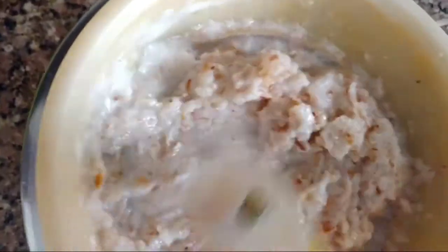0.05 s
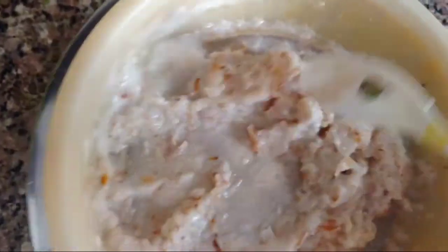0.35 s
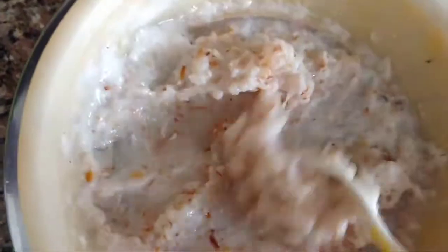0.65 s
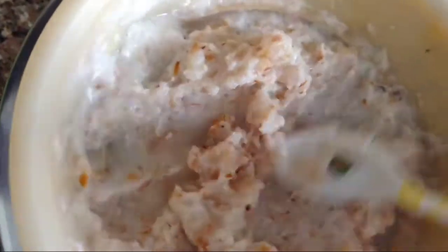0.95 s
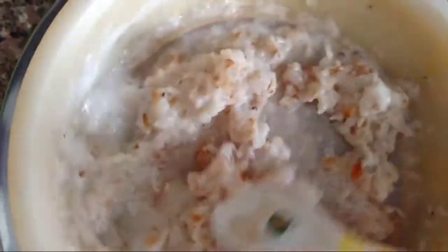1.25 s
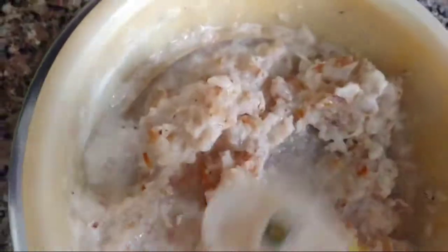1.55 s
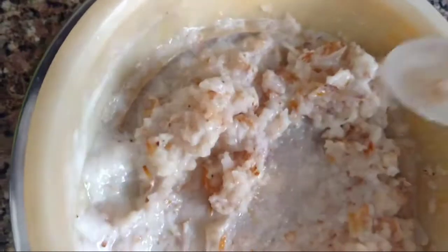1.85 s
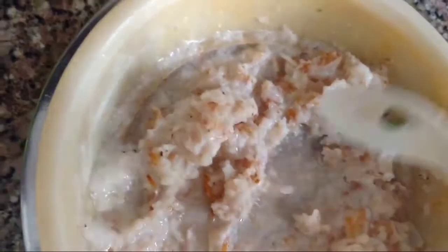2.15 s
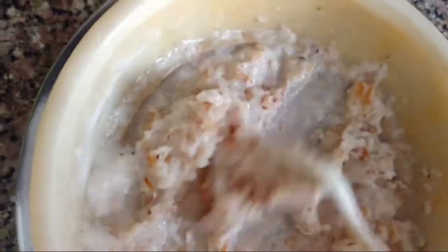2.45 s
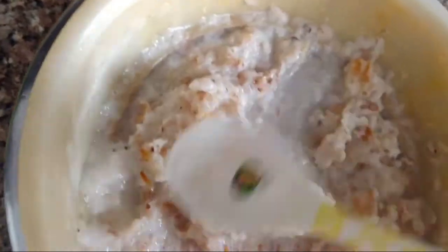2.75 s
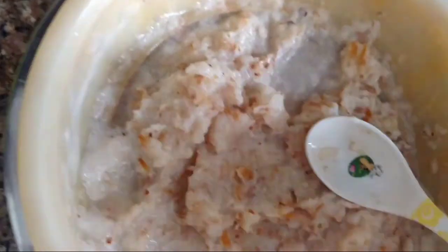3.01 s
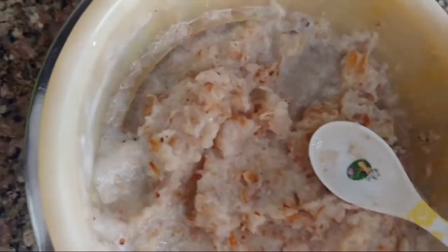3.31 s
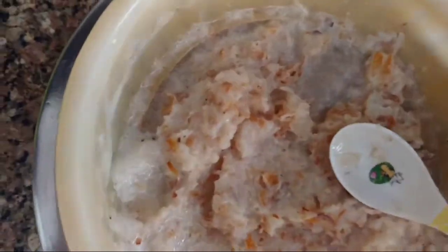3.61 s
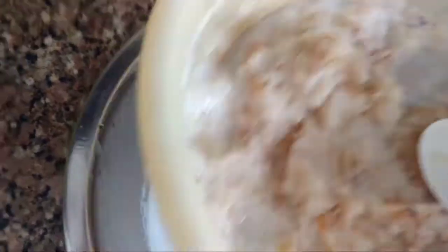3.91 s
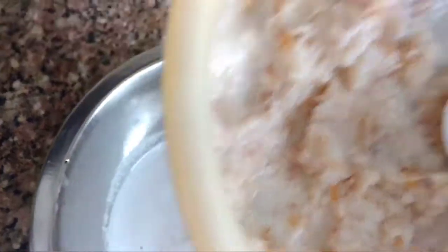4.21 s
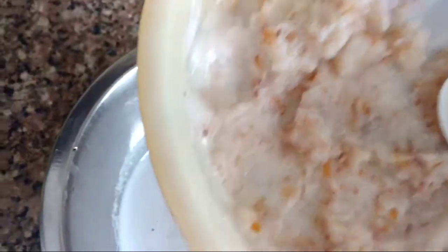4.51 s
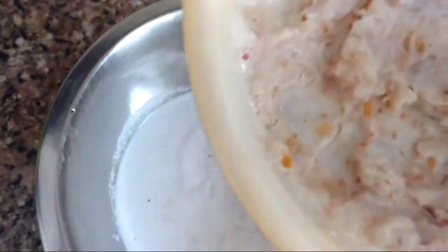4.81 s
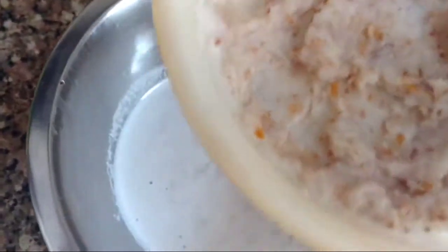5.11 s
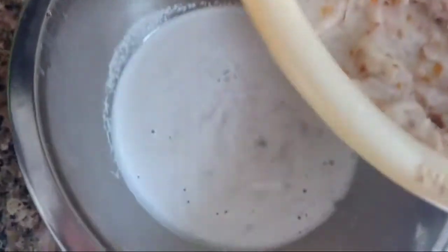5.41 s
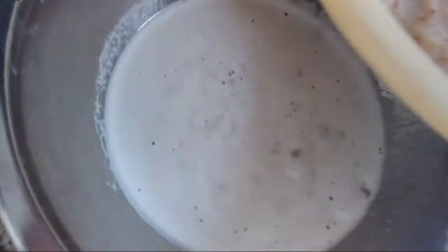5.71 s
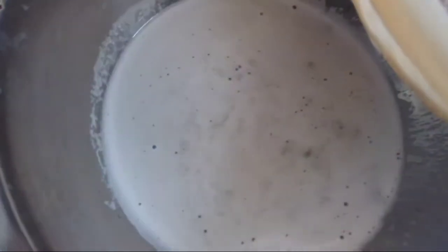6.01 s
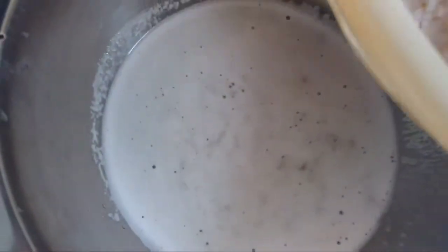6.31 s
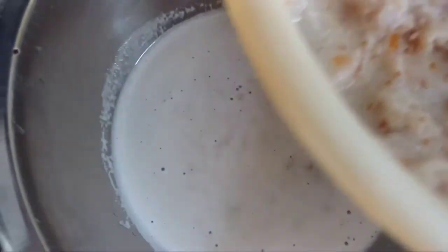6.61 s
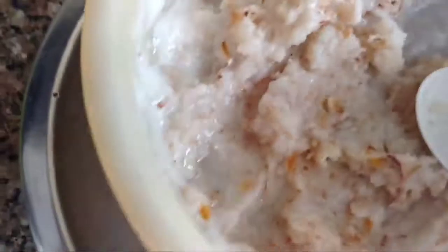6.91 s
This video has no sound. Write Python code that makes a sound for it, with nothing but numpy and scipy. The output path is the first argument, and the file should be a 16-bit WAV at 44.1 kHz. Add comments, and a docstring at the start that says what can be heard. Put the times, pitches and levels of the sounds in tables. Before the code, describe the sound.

Wet crackling, scraping and taps of a spoon mashing pulp in a strainer, followed by fan-like hiss and one dull clack.

```python
"""A plastic spoon presses wet fruit pulp through a strainer resting in a steel bowl.
Bursting films and air pockets crackle, tick and smack; squeezed air gurgles. The spoon rubs, taps
and bumps the strainer, and the bowl rings. The strainer is lifted over the rim and at last set down
on the bowl. A fan-like hiss fills the kitchen. A close two-port microphone with gain control hears it."""
import sys
import numpy as np
from scipy import signal
from scipy.fft import rfft, irfft, next_fast_len
from scipy.io import wavfile
from scipy.ndimage import uniform_filter1d, minimum_filter1d, map_coordinates

SR = 44100
rng = np.random.default_rng(int(sys.argv[2]) if len(sys.argv) > 2 else 0)


def to_wav(s):
    """Save 16-bit WAV."""
    ch = np.atleast_2d(s).T  # columns
    pcm = np.round(np.clip(ch, -1, 1) * 32767)  # PCM
    wavfile.write(sys.argv[1], SR, pcm.astype(np.int16))


N = 306759
FFT_N = next_fast_len(N)
TIME_S = np.arange(N) / SR

# Fan hiss. Each row: frequency in Hz, relative density in dB.
HISS_SPECTRUM = [(25, -16), (55, -18.5), (100, -3.5), (170, -1), (255, -12), (330, -3), (600, -5.5),
                 (1000, -11.5), (1500, -14), (2800, -17.5), (5000, -25.5), (8500, -30), (12000, -39),
                 (15000, -46)]
# Hiss as the microphone moves. Each row: time in seconds, level in dB.
HISS_LEVELS = [(0, -38.5), (.9, -38.5), (2.2, -38.5), (3.1, -38), (3.6, -44), (4.1, -40), (4.8, -38.5),
               (5.5, -38), (6.3, -38.5), (6.96, -38)]
# Fan hum. Each row: frequency in Hz, level against the hiss in dB.
HUM_LINES = [(214, -15), (325, -15), (343, -15.5), (441, -12.5)]
# Likeness of the ports for room sound and for close sound. Each row: frequency in Hz, correlation.
ROOM_CORRELATION = [(50, -0.98), (125, -0.55), (260, -0.13), (500, 0.83), (1000, 0.14), (2200, -0.11),
                    (16000, 0.15)]
NEAR_CORRELATION = [(60, -0.34), (300, 1), (1200, 0.47), (2400, 0.27), (4000, -0.13), (16000, -0.025)]
# Spoon strokes. Each row: hardest push, swell and ease in seconds, crackle and rubbing in dB.
SPOON_STROKES = [(0.01, 0.093, 0.062, -38, -61), (.34, 0.31, 0.09, -47.5, -40.5),
                 (.395, 0.17, 0.089, -44, -59), (.74, 0.34, 0.2, -48.5, -47),
                 (.997, 0.05, 0.15, -37.5, -45), (1.1, 0.057, 0.17, -45, -38),
                 (1.455, 0.11, 0.13, -36.5, -35), (1.56, 0.081, 0.22, -45, -39.5),
                 (1.72, 0.13, 0.073, -49, -38.5), (1.805, 0.096, 0.1, -44, -36.5),
                 (2.49, 0.13, 0.11, -42.5, -38), (2.58, 0.067, 0.2, -48.5, -47),
                 (2.69, 0.075, 0.23, -69, -43.5), (2.88, 0.032, 0.27, -51, -45.5),
                 (3.53, 0.27, 0.35, -54, -43.5), (3.63, 0.076, 0.079, -48, -41),
                 (3.72, 0.019, 0.045, -40.5, -40), (3.85, 0.13, 0.091, -52, -41.5),
                 (3.902, 0.03, 0.058, -37, -57)]
# Wet crackle and mesh rubbing. Each row: frequency in Hz, relative density in dB.
CRACKLE_SPECTRUM = [(300, -23), (1000, -2), (2200, -2), (4000, -1), (8500, -0.5), (11000, -7), (15000, -23)]
RUB_SPECTRUM = [(120, -24.5), (330, 10), (600, 6.5), (900, 5), (1250, 5.5), (1800, -13.5), (3000, 1.5),
                (8000, -52)]
# Large air pockets. Each row: snap time in seconds, relative level in dB, centre in Hz,
# t60 in seconds, relative level of the tear in dB.
POCKET_SMACKS = [(.014, -32, 5570, 0.033, -2.5), (0.16, -38.5, 4050, 0.033, -7),
                 (0.214, -42.5, 6860, 0.052, -3), (0.379, -28, 6900, 0.034, -18),
                 (0.3936, -30, 5360, 0.037, -6), (0.947, -35, 4230, 0.042, 0),
                 (.951, -37, 7500, 0.011, -14), (1.265, -35, 7700, 0.014, -9),
                 (1.276, -30.5, 6270, 0.007, -22), (1.313, -35.5, 6550, 0.043, -9),
                 (1.346, -36, 3940, 0.0081, -26), (1.369, -37.5, 6340, 0.035, -7),
                 (1.443, -32, 6460, 0.022, -13), (1.4593, -22.5, 6950, 0.038, -12),
                 (1.679, -33, 6200, 0.023, -3), (1.7115, -33, 6140, 0.053, -11),
                 (1.762, -32, 6740, 0.047, -7), (1.798, -37, 5800, .041, -7),
                 (2.462, -30.5, 3920, 0.028, -9), (2.498, -33.5, 6440, 0.049, -12),
                 (2.565, -39.5, 5600, 0.033, -14), (2.8627, -32, 6160, 0.029, -10),
                 (3.621, -35, 3500, 0.13, 0.5), (3.7133, -37, 6900, 0.024, -11),
                 (3.8894, -25.5, 5030, 0.05, -9), (3.8941, -32, 5900, .03, -8),
                 (3.9143, -35, 5200, .03, -7), (4.032, -42, 4900, 0.032, -6),
                 (6.8245, -39, 5500, 0.014, -14)]
# Spoon on strainer. Each row: start in seconds, then clack level, hollow body, treble,
# spoon ring and bowl ring in dB.
SPOON_TAPS = [(.052, -32.5, 1, -27, -36, -46), (.439, -37.5, 4, -20, -34, -53),
              (0.489, -32, -3, -4, -31.5, -58), (.947, -36, 15, -11, -38, -62),
              (0.9798, -21.5, -2.5, -2.5, -34, -41), (1.008, -30.5, 7, -10, -34, -49),
              (1.13, -42, -16, 1.5, -43, -65), (1.294, -37.5, -5, -10, -41, -67),
              (1.4298, -40, 8, -15, -35, -60), (1.557, -40, -21, -8, -37, -62),
              (2.884, -38.5, 7, -22, -49, -62), (3.165, -19, 3, 0, -19, -48),
              (3.178, -33, 3, -23, -26, -60), (3.4514, -36, 5, 0.5, -39, -54),
              (3.7215, -43, -1, -8, -44, -64), (3.8501, -33, 5, 0.5, -33, -44.5)]
# Plastic clack. Each row: frequency in Hz, relative density in dB.
TAP_SPECTRUM = [(80, -15), (220, -19), (420, -2.5), (1050, -2), (1800, -1.5), (2250, 7), (3000, -3.5),
                (4000, -6.5), (6500, -7), (9500, -8.5), (11500, -21), (15000, -24)]
# Hollow body of the clack. Each row: frequency in Hz, multiplier of the tap's body dB.
BODY_WEIGHTS = [(1600, 2.5), (2100, 1.5)]
# Cushioning by pulp. Each row: frequency in Hz, multiplier of the tap's treble dB.
TREBLE_WEIGHTS = [(2200, 0), (3800, -0.2), (6500, 2.5)]
# Plastic spoon. Each row: frequency in Hz, relative level in dB, bare t60 in seconds.
SPOON_MODES = [(970, -0.5, 0.041), (1135, -8, 0.05), (1460, -1, 0.047), (1524, -13.5, 0.097),
               (1790, -7, 0.1), (2060, -15, 0.03), (2950, -9, 0.037), (3930, -12, 0.024)]
# Steel bowl. Each row: frequency in Hz, relative level in dB, t60 and rise in seconds.
BOWL_MODES = [(337, -14, 0.28, .002), (412, 15.5, 0.18, 0.031), (621, 0, 0.2, 0.0013),
              (905, 2, 0.11, 0.001), (1132, -7, 0.52, 0.0013), (1315, -10, 0.4, 0.0017),
              (1348, -3, 0.098, 0.0012), (1540, -12, 0.35, 0.00083), (1605, -15, 0.18, 0.00084),
              (1950, -19, 0.22, 0.00091), (2570, -7, 0.065, 0.0011), (3440, -38, 0.29, .001),
              (4500, -26.5, 0.23, 0.0011)]
# Soft blows on the loaded strainer. Each row: start in seconds, thud in dB and Hz,
# flex in dB and Hz, flex t60 in seconds, after-ring in dB.
STRAINER_BUMPS = [(0.2114, -17.5, 156, -15.5, 290, 0.036, -37), (0.4882, -34, 135, -18, 325, 0.027, -50),
                  (0.9782, -46, 171, 2, 391, 0.026, -20), (1.008, -30, 110, -20.5, 345, .05, -46),
                  (1.313, -16.5, 143, -9.5, 320, 0.022, -38), (1.555, -22.5, 128, -22, 318, .03, -51),
                  (1.7049, -13, 130, -6, 325, 0.023, -33), (1.738, -38, 135, -19, 298, 0.046, -39),
                  (1.79, -25, 133, -19, 383, 0.031, -40), (2.4077, -21, 206, -7.5, 335, 0.031, -25.5),
                  (2.455, -31, 134, -19, 343, 0.043, -35), (2.673, -47, 135, -27, 347, 0.048, -38),
                  (3.165, -40, 135, -18, 414, 0.034, -29.5), (3.636, -41, 135, -23.5, 323, .055, -39),
                  (3.8493, -35, 110, -10, 447, 0.038, -40), (6.825, -33, 135, -19, 217, .04, -27),
                  (6.854, -31, 149, -22, 207, 0.049, -44)]
# Air squeezed under the spoon. Each row: start in seconds, relative level in dB, length in seconds,
# start and end pitch in Hz.
AIR_GURGLES = [(0.331, -36, 0.037, 1086, 887), (1.432, -31, 0.012, 670, 753),
               (1.436, -38.5, 0.02, 1346, 1560), (1.79, -30.5, 0.033, 1406, 1170),
               (1.843, -44, 0.011, 1210, 1180), (2.484, -28, 0.019, 1220, 1270),
               (2.501, -30.5, 0.031, 1240, 930), (3.814, -40, 0.03, 2190, 2030)]
# Thin films snapping. Each row: start in seconds, level in dB, centre in Hz.
FILM_TICKS = [(0.613, -51, 10000), (0.647, -45, 9600), (0.721, -44, 10000), (1.168, -46, 8000),
              (1.5975, -55, 6500), (1.67, -41, 9000), (1.679, -38, 5970), (1.718, -42, 6500),
              (1.7425, -45, 4220), (1.7992, -46, 7000), (2.1428, -44.5, 7500), (2.282, -49, 10400),
              (3.04, -50, 11500)]
# Strainer dragged over the rim. Each row: peak, swell and ease in seconds, level in dB.
RIM_DRAGS = [(3.9, 0.14, 0.19, -40)]
# Zing of that contact. Each row: frequency in Hz, relative level in dB, t60 in seconds.
ZING_MODES = [(1252, 1, 0.14), (2940, -1, 0.031), (4360, -12, 0.01), (6520, -2, 0.0094), (9300, -11, 0.01)]
# Strainer rubbing in the hand. Each row: peak, swell and ease in seconds, level in dB.
HAND_RUBS = [(6.32, 0.32, 0.49, -36.5)]
# Colour of that rub. Each row: frequency in Hz, relative density in dB.
HAND_SPECTRUM = [(100, -19), (300, -2.5), (700, 5), (1300, -9.5), (2000, -8.5), (3000, -31), (8000, -50)]
# Strainer landing and rocking once. Each row: start in seconds, level in dB, tilt in dB per octave,
# clatter t60 in seconds, snap-to-clatter ratio, bowl ring in dB.
LANDING_HITS = [(6.858, -15, 4, 0.02, 1.8, -21), (6.8723, -29, 12, .02, 0.95, -46)]
# Its dull clack. Each row: frequency in Hz, relative density in dB.
LANDING_SPECTRUM = [(30, -42), (70, -12), (110, -18), (220, -3), (420, 15.5), (900, 7.5), (1650, 1),
                    (2150, -11), (2750, -9), (3300, -23.5), (4000, -20), (7000, -29), (12500, -43),
                    (15000, -58)]
# Kitchen reverberation. Each row: frequency in Hz, t60 in seconds.
ROOM_DECAY = [(150, 0.93), (500, 0.19), (2000, 0.47), (6000, 0.26), (14000, 0.15)]

TEAR_S = 0.0073  # a film stretches and tears this long before it snaps


def gain_of(db):
    """Decibels to amplitude."""
    return 10 ** (np.asarray(db) / 20)


def unit_rms(x):
    """Scales to rms 1."""
    return x / np.sqrt(np.mean(x ** 2) + 1e-20)


def value_at(points, hz):
    """Interpolates on a log-frequency axis."""
    points_hz, values = np.transpose(points)
    return np.interp(np.log(hz + 1), np.log(points_hz + 1), values)


def add(mix, start_s, sound):
    """Mixes a sound in at start_s."""
    part = mix[:, max(0, round(start_s * SR)):][:, :sound.shape[-1]]
    part += sound[..., :part.shape[1]]


def drift(rate_hz):
    """Smooth random wander of rms 1."""
    hz = np.fft.rfftfreq(FFT_N, 1 / SR)
    slow = rfft(rng.standard_normal(FFT_N)) * np.exp(-(hz / rate_hz) ** 2)
    return unit_rms(irfft(slow, FFT_N)[:N])


def highpass(x, corner_hz):
    """Second-order bass cut."""
    return signal.sosfilt(signal.butter(2, corner_hz, "high", fs=SR, output="sos"), x)


def colour(x, spectrum, size=2048):
    """Minimum-phase filter with the given spectrum."""
    log_gain = np.log(gain_of(value_at(spectrum, abs(np.fft.fftfreq(size, 1 / SR)))))
    impulse = np.fft.ifft(np.exp(np.conj(signal.hilbert(log_gain)))).real
    return signal.fftconvolve(x, impulse[None, :size // 2], axes=1)[:, :x.shape[1]]


def ports(x, correlation):
    """Turns two unrelated signals into a correlated pair."""
    size = next_fast_len(x.shape[1])
    same = np.clip(value_at(correlation, np.fft.rfftfreq(size, 1 / SR)), -.99, .99)
    common, apart = rfft(x, size) * np.sqrt([(1 + same) / 2, (1 - same) / 2])
    return irfft([common + apart, common - apart], size)[:, :x.shape[1]]


def burst(spectrum, t60_s, snap, size=4096):
    """An impulse of size snap and a dying rattle after 20 lead-in samples; rms 1 over the first 10 ms."""
    t = np.arange(size) / SR
    x = rng.standard_normal((2, size)) * gain_of(-60 * t / t60_s)
    x /= np.linalg.norm(x[0])
    x[:, 0] += snap * np.array([1, .5])
    x = ports(colour(np.pad(x, ((0, 0), (20, 0))), spectrum), NEAR_CORRELATION)
    return x / np.sqrt(np.mean(x[:, :SR // 100] ** 2))


def mode(hz, t60_s, rise_s):
    """One damped resonance, eased in by a soft contact."""
    t = np.arange(SR // 2) / SR
    onset = 1 - np.exp(-(t / rise_s) ** 2)
    return np.sin(2 * np.pi * hz * t) * gain_of(-60 * t / t60_s) * onset


def grains(per_s, spread_db):
    """Random tiny clicks of uneven size at each port."""
    sizes = gain_of(spread_db * np.minimum(rng.exponential(1, (2, N)), 4))
    return unit_rms(sizes * rng.standard_normal((2, N)) * (rng.random((2, N)) < per_s / SR))


def push(peak_s, swell_s, ease_s, range_db=20):
    """Pressure gains range_db over the swell and loses it over the ease."""
    away = np.maximum((peak_s - TIME_S) / swell_s, (TIME_S - peak_s) / ease_s)
    return gain_of(-range_db * np.minimum(away, 10))


def fan():
    """Steady rush of air with a few wavering hum lines."""
    air = ports(colour(rng.standard_normal((2, N)), HISS_SPECTRUM), ROOM_CORRELATION)
    air = unit_rms(air) * gain_of(0.68 * drift(27))
    hum = np.zeros(N)
    for hz, db in HUM_LINES:
        amplitude = np.sqrt(2) * gain_of(db + 1.05 * drift(21))
        hum += amplitude * np.sin(2 * np.pi * np.cumsum(hz + 4 * drift(12.33)) / SR)
    level_db = np.interp(TIME_S, *np.transpose(HISS_LEVELS))
    return (air + hum) * gain_of(level_db)


def counter_echo(x, delay_s=.0035, share=0.29):
    """The counter reflects the hiss; the path changes as the hand-held microphone sways."""
    late_s = TIME_S - delay_s * (1 + 0.104 * drift(1.17))
    echo = np.array([map_coordinates(port, [late_s * SR], order=3) for port in x])
    return (x + share * echo) / np.sqrt(1 + share ** 2)


def pressing():
    """Amplitudes of crackle and rubbing, summed in power over all strokes."""
    power = sum((gain_of([[crackle_db], [rub_db]]) * push(peak_s, swell_s, ease_s)) ** 2
                for peak_s, swell_s, ease_s, crackle_db, rub_db in SPOON_STROKES)
    return np.sqrt(power + 1e-18)


def pulp_crackle(wetness):
    """Pressing bursts countless tiny wet films and a few sticky ones."""
    tiny = grains(per_s=3100, spread_db=-3)
    sticky = 0.39 * grains(per_s=120, spread_db=3)
    flicker_db = 2 * drift(46) + 1.5
    return unit_rms(colour(tiny + sticky, CRACKLE_SPECTRUM)) * wetness * gain_of(flicker_db)


def mesh_rubbing(friction):
    """Tiny slips of the spoon over the mesh, coloured by the strainer."""
    return unit_rms(colour(grains(per_s=3000, spread_db=0), RUB_SPECTRUM)) * friction


def smack(hz, t60_s, tear_db):
    """One air pocket tears, then bursts in a dense spray; small ones open faster."""
    spectrum = [(hz * 0.055, -15), (hz * 0.5, -7), (hz * 0.67, -.5),
                (hz * 1.33, 0), (hz * 1.66, -9), (hz * 2.7, -18)]
    tear = burst(spectrum, min(0.034, t60_s), snap=0)[:, 20:20 + round(TEAR_S * SR)]
    spray = burst(spectrum, t60_s, snap=0.42)[:, 20:]
    opening = 1 - np.exp(-TIME_S[:spray.shape[1]] / (0.019 * t60_s))
    return np.hstack([gain_of(tear_db) * tear[:, ::-1], gain_of(1.5) * spray * opening])


def pocket_smacks(wetness, pops_per_s=11, pop_hz=6400):
    """Large pockets burst as pulp tears loose; small ones pop at random, louder under pressure."""
    out = np.zeros((2, N))
    for snap_s, db, hz, t60_s, tear_db in POCKET_SMACKS:
        add(out, snap_s - TEAR_S, gain_of(db) * smack(hz, t60_s, tear_db))
    last_push_s = SPOON_STROKES[-1][0]
    for when, size, pitch in rng.random((round(pops_per_s * last_push_s), 3)):
        start_s = when * last_push_s
        pressure = (wetness[int(start_s * SR)] / wetness.max()) ** 0.7
        pop = smack(pop_hz * 2 ** (pitch - .5), t60_s=0.016, tear_db=-9)
        add(out, start_s, pressure * gain_of(-47 + 17 * size) * pop)
    return out


def spoon_ring(treble_db):
    """The spoon's modes, uneven between the ports and without bass; pulp cuts them short."""
    t60_scale = 2 ** (0.054 * treble_db)
    ring = 0
    for hz, db, t60_s in SPOON_MODES:
        port_gains = gain_of(db) * rng.choice([-1, 1]) * rng.uniform(0.49, 1, (2, 1))
        ring += port_gains * mode(hz, t60_s * t60_scale, rise_s=.0006)
    return highpass(ring, 600)


def bowl_ring(tilt_db_per_octave):
    """The steel bowl's modes after one blow."""
    pivot_hz = BOWL_MODES[1][0]
    ring = 0
    for hz, db, t60_s, rise_s in BOWL_MODES:
        amplitude = gain_of(db + tilt_db_per_octave * np.log2(hz / pivot_hz))
        ring += amplitude * rng.choice([-1, 1]) * mode(hz, t60_s, rise_s)
    return ring


def spoon_taps():
    """Plastic clacks and the bowl rings on. Pulp dulls both and shortens the clack."""
    out = np.zeros((2, N))
    for start_s, db, body_db, treble_db, spoon_db, bowl_db in SPOON_TAPS:
        spectrum = []
        for hz, bare_db in TAP_SPECTRUM:
            shaping_db = body_db * value_at(BODY_WEIGHTS, hz) + treble_db * value_at(TREBLE_WEIGHTS, hz)
            spectrum.append((hz, bare_db + shaping_db))
        t60_s = max(0.026 + 0.1 * treble_db, .01)
        add(out, start_s - .0005, gain_of(db) * burst(spectrum, t60_s, snap=0.3))
        add(out, start_s, gain_of(spoon_db) * spoon_ring(treble_db))
        add(out, start_s, gain_of(bowl_db) * bowl_ring(tilt_db_per_octave=5.5 + 2.7 * treble_db))
    return out


def strainer_bumps():
    """The bowl thuds on the counter; the strainer, damped by pulp, flexes and rings faintly."""
    out = np.zeros((2, N))
    near, far = out[:1], out[1:]
    for start_s, thud_db, thud_hz, flex_db, flex_hz, t60_s, after_db in STRAINER_BUMPS:
        thud = gain_of(thud_db) * mode(thud_hz, t60_s=0.042, rise_s=0.002)
        add(near, start_s, thud)
        add(far, start_s + 0.0019, .7 * thud)
        flex = gain_of(flex_db) * mode(flex_hz, t60_s, rise_s=0.0029)
        after_ring = gain_of(after_db) * mode(hz=336, t60_s=0.22, rise_s=0.007)
        add(near, start_s, flex + after_ring)
        add(far, start_s + 0.000062, .75 * (flex + after_ring))
    return highpass(out, 80)  # no deep bass below 80 Hz


def air_gurgles():
    """A small air cavity sings briefly, its pitch sliding as its size changes."""
    out = np.zeros((2, N))
    for start_s, db, length_s, start_hz, end_hz in AIR_GURGLES:
        size = round(length_s * SR)
        waver, flutter = (unit_rms(uniform_filter1d(v, size=90)) for v in rng.standard_normal((2, size)))
        hz = np.linspace(start_hz, end_hz, size) * (1 + 0.034 * waver)
        swell = np.sin(np.linspace(0, np.pi, size)) * gain_of(db + 5.3 * flutter)
        add(out, start_s, swell * np.sin(2 * np.pi * np.cumsum(hz) / SR))
    return out


def film_ticks():
    """Single films break: a sharp, thin click with almost no body."""
    out = np.zeros((2, N))
    for start_s, db, hz in FILM_TICKS:
        spectrum = [(hz * 0.22, -22), (hz * 0.25, -9), (hz, 0), (hz * 1.3, -9)]
        add(out, start_s - .0005, gain_of(db) * burst(spectrum, t60_s=0.016, snap=0.96))
    return out


def rim_drag():
    """Quick slips of the strainer over the rim keep a thin metallic zing going."""
    level = sum(gain_of(db) * push(*timing_s) for *timing_s, db in RIM_DRAGS)
    slips = grains(per_s=1200, spread_db=3)
    zing = 0
    for hz, db, t60_s in ZING_MODES:
        ring = signal.oaconvolve(slips, mode(hz, t60_s, rise_s=.0002)[None], axes=1)[:, :N]
        zing += gain_of(db) * unit_rms(ring)
    return unit_rms(zing) * level


def hand_rub():
    """The lifted strainer rubs slowly and softly in the hand."""
    level = sum(gain_of(db) * push(*timing_s) for *timing_s, db in HAND_RUBS)
    slips = unit_rms(colour(grains(per_s=1700, spread_db=-1), HAND_SPECTRUM))
    return ports(slips * level, NEAR_CORRELATION)


def strainer_landing():
    """The heavy strainer meets the rim, rocks once and sets the bowl's low modes ringing."""
    out = np.zeros((2, N))
    for start_s, db, tilt_db_per_octave, t60_s, snap, bowl_db in LANDING_HITS:
        spectrum = [(hz, base_db + tilt_db_per_octave * np.log2(min(hz, 2100)))
                    for hz, base_db in LANDING_SPECTRUM]
        add(out, start_s - .0005, gain_of(db) * burst(spectrum, t60_s, snap))
        add(out, start_s, gain_of(bowl_db) * bowl_ring(tilt_db_per_octave=-8.5))
    return out


def kitchen_reverb(x, echoes_per_s=3000, gap_s=.005):
    """Sparse reflections that die band by band."""
    echoes = rng.choice([-1., 1.], (2, SR // 2)) * (rng.random((2, SR // 2)) < echoes_per_s / SR)
    echoes[:, :int(gap_s * SR)] = 0
    hz, t, bands = signal.stft(echoes, SR, nperseg=256)
    decay = gain_of(-60 * t / value_at(ROOM_DECAY, hz)[:, None])
    tail = signal.istft(bands * decay, SR, nperseg=256)[1]
    tail /= np.linalg.norm(tail[0])
    return ports(signal.fftconvolve(x, tail, axes=1)[:, :N], ROOM_CORRELATION)


def scene():
    """Spoon, pulp and bowl close by, in the kitchen's hiss."""
    wetness, friction = pressing()
    pulp = ports(pulp_crackle(wetness) + mesh_rubbing(friction), NEAR_CORRELATION)
    pulp += gain_of(-3) * pocket_smacks(wetness) + film_ticks() + gain_of(-4) * air_gurgles()
    utensils = spoon_taps() + strainer_bumps() + rim_drag() + hand_rub()
    landing = strainer_landing()
    reverb = kitchen_reverb(gain_of(-10.5) * pulp + gain_of(-12) * utensils + gain_of(-15) * landing)
    hiss = counter_echo(fan()) * gain_of([[-.4], [.4]])
    return pulp + utensils + landing + reverb + hiss


def widen(x, delay_s=0.0004012, corner_hz=650):
    """Above the corner, each channel subtracts the other port, delayed by the travel time between them."""
    hz = np.fft.rfftfreq(FFT_N, 1 / SR)
    share = .98 * hz ** 4 / (hz ** 4 + corner_hz ** 4)
    own = rfft(x, FFT_N)
    other = np.exp(-2j * np.pi * hz * delay_s) * own[::-1]
    return irfft((own - share * other) / np.sqrt(1 + share ** 2), FFT_N)[:, :N]


def gain_control(x, threshold_db=-27, hold_s=0.15, recovery_db_per_s=45, attack_s=0.082):
    """A sharp knock pulls the gain down; it holds, then creeps back."""
    power = uniform_filter1d((highpass(x, 700) ** 2).mean(0), size=440)
    over_db = np.maximum(10 * np.log10(abs(power) + 1e-12) - threshold_db, 0)
    span = int(hold_s * SR) // 2 * 2 + 1
    held_db = -minimum_filter1d(-over_db, span, origin=span // 2)
    recovery_db = TIME_S * recovery_db_per_s
    cut_db = np.maximum.accumulate(held_db + recovery_db) - recovery_db
    pole = np.exp(-1 / (attack_s * SR))
    return x * gain_of(-signal.lfilter([1 - pole], [1, -pole], cut_db))


def record(dry):
    """Stereo widening, gain control, full-scale clipping and a 15.5 kHz band limit."""
    clipped = np.clip(gain_control(widen(dry)), -1, 1)
    lowpass = signal.firwin(255, 15500, window=("kaiser", 9), fs=SR)
    return signal.oaconvolve(clipped, lowpass[None], "same")


dry = scene()
out = record(dry)
to_wav(out)
```